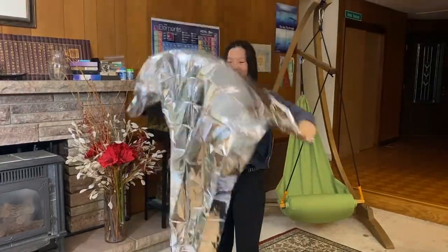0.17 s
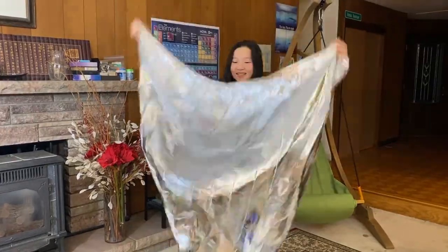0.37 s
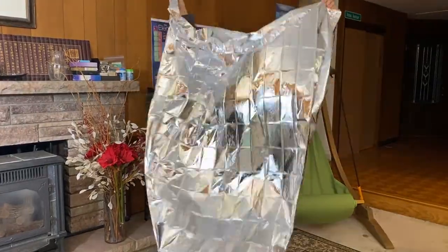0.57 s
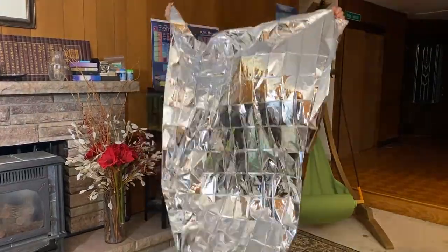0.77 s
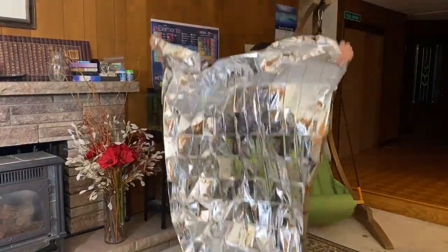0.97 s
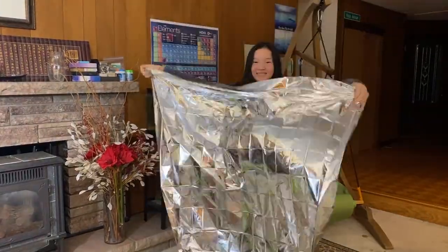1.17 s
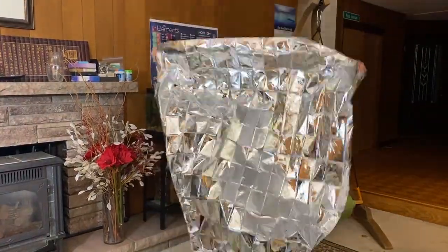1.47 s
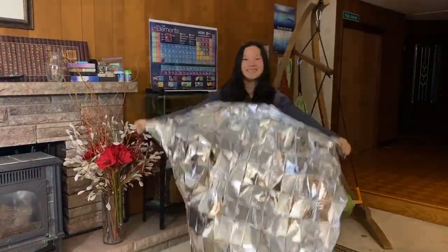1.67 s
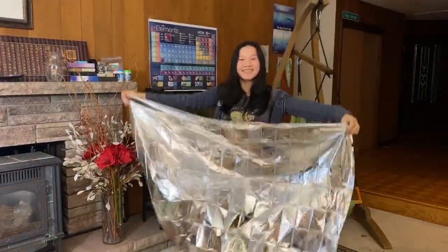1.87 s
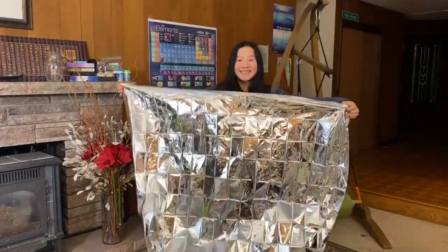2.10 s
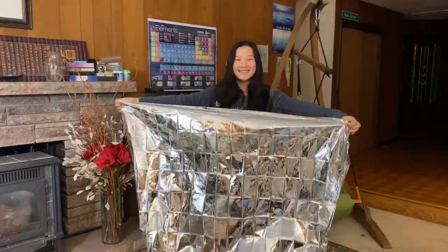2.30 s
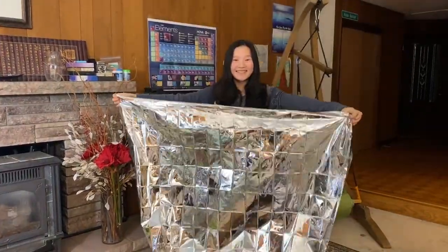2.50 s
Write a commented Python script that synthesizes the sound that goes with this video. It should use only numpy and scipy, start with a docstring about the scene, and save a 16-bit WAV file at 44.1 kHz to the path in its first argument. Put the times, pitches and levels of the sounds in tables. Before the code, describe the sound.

Bright, dense crackling of a foil-like sheet being flung and spread: a strong early surge, a lull, several shorter swells, then quiet rustling, heard in stereo from a few metres away in a living room.

```python
"""A thin metallised plastic sheet is shaken and spread out a few metres away in a panelled living room.
Thousands of creases buckle each second, more and harder the faster the sheet moves: random clicks,
which the room's dying noise tails smear into a rustle. A flap of the whole sheet is a low puff of noise.
A close pair of microphones hears it over a faint low room tone of steady, dull noise."""
import sys
import numpy as np
from scipy import signal
from scipy.fft import rfft, irfft, next_fast_len
from scipy.io import wavfile

SR = 44100
rng = np.random.default_rng(int(sys.argv[2]) if len(sys.argv) > 2 else 0)


def unload_wav(signal):
    """Save mono or channel-first audio to the path in sys.argv[1] as 16-bit WAV at rate SR, clipped to [-1, 1]."""
    wavfile.write(
        sys.argv[1],
        SR,
        np.round(np.clip(np.atleast_2d(signal).T, -1, 1) * 32767).astype(np.int16),
    )


def invert_db(level):
    """Linear amplitude ratio for a level in decibels (20 dB per decade), elementwise."""
    return 10 ** (np.asarray(level, dtype=float) / 20)


N = 116865   # length in samples


# Movement of the sheet a few metres off, as the rustle at the microphone pair, before the sheet's gain.
# Each row: time in seconds [s], level in dB [dB], treble over that level [dB], lows over that level [dB].
SHEET_MOTION = [(0.0, -43.5, 0, -1.5), (0.1, -44, -3.5, -3.5), (0.15, -40, -1, -5), (0.239, -34, .3, 1),
                (0.3, -36, -1.2, 2), (0.39, -35.5, -2.5, -4.5), (0.425, -29.5, 2.5, -5.5),
                (0.459, -26.5, 2, 3.5), (0.521, -31, -0.7, -1.5), (0.661, -37.5, 1.4, -1),
                (0.74, -42, -0.8, -2.5), (0.825, -47, -3, -3), (0.855, -45, -2, -3), (0.97, -51, -1.5, -2),
                (1.065, -47, -.4, -5), (1.11, -50.5, 0, 5), (1.19, -46.5, -3, -6), (1.24, -41, 1, -2.5),
                (1.35, -35, -0.5, -4), (1.42, -40, -0.5, -1.5), (1.5, -41, -.6, -3),
                (1.61, -45, -1.5, -2.5), (1.68, -40.5, -2.5, -5), (1.71, -36.5, 3.5, -2),
                (1.755, -32.5, -0.2, 4.3), (1.83, -45, -3, -1), (1.875, -43.5, -1.5, -3.5),
                (1.941, -36, -0.7, -4.5), (1.99, -34, -2.2, -5), (2.1, -40.5, -0.5, -1),
                (2.2, -43, -5, -8.5), (2.34, -49.5, -4, -1.5), (2.45, -49, -5, -2.5), (2.52, -52, -6.5, -4),
                (2.565, -49.5, -2.5, -4), (2.65, -51.5, -5.5, -2.2)]
# Spectrum of the part that both microphones hear alike, with a narrow gap near 13.4 kHz.
# Each row: frequency in hertz [Hz], gain per hertz in dB [dB].
COMMON_SPECTRUM = [(18, -42), (30, -39), (60, -7), (112, -5.5), (230, -2.5), (500, -2.5), (1240, -1.5),
                   (5300, -2.5), (7470, -2), (8530, -5.5), (10800, 1.44), (12500, -3.5), (12900, 6),
                   (13200, -21), (13650, -21), (13900, 3), (14600, 1), (15700, -11), (16500, -16)]
# Spectrum of the part in which the left and right microphones differ.
# Each row: frequency in hertz [Hz], gain per hertz in dB [dB].
DIFFERENCE_SPECTRUM = [(18, -50), (60, -33), (190, -32), (300, -15.5), (500, -7.5), (1150, -5), (1900, -3),
                       (2340, -6), (3570, -3.5), (6720, -4), (8500, 3), (9400, 0), (10200, -7.5),
                       (10800, -12), (11900, -6), (12600, -6), (13200, -9), (14000, -12), (15000, -7),
                       (16500, -11)]


def sheet():
    """Buckling creases, direct and through the room, in half-octave bands that follow the movement."""
    treble_hz, lows_hz = 8250, 424   # where the treble and the lows begin
    flicker_db, flicker_hz = 0.73, 11   # each band wavers on its own
    room_db = -2.5   # room sound against direct sound
    seconds, *columns = np.transpose(SHEET_MOTION)
    level_db, treble_db, lows_db = [np.interp(np.arange(N) / SR, seconds, c) for c in columns]

    common, difference = snaps(level_db), snaps(level_db)
    wet = invert_db(room_db) * room(common)
    loudness = np.sqrt(1 + invert_db(2 * room_db))
    common = (common + wet[0]) / loudness
    difference = (difference + wet[1]) / loudness
    pair = np.array([colour(common, lambda hz: at_hz(COMMON_SPECTRUM, hz)),
                     colour(difference, lambda hz: at_hz(DIFFERENCE_SPECTRUM, hz))])

    size = next_fast_len(N)
    spectrum = rfft(pair, size)
    octave = np.log2(np.arange(size // 2 + 1) * SR / size + 1)
    rustle = 0
    for centre in np.arange(3, 15.1, .5):   # log2 of the band's frequency in Hz
        triangle = np.clip(1 - 2 * np.abs(octave - centre), 0, 1)
        band = irfft(spectrum * triangle, size)[:, :N]
        treble_share = 1 / (1 + (treble_hz / 2 ** centre) ** 4)
        lows_share = 1 / (1 + (2 ** centre / lows_hz) ** 2)
        flicker = flicker_db * drift(flicker_hz)
        rustle = rustle + band * invert_db(treble_share * treble_db + lows_share * lows_db + flicker)
    return invert_db(7.5) * rustle


def snaps(level_db):
    """Creases buckle as clicks of uneven size, more often with movement and in clumped runs."""
    snaps_per_s, rate_follows = 7000, .3   # rate at the mean level; dB of rate per dB of level
    size_spread_db = 3.   # scale of the random excess in size
    clump_db, clump_hz = 1.5, 60.   # creases give way in runs
    motion_db = rate_follows * (level_db - level_db.mean())
    rate_db = motion_db + clump_db * drift(clump_hz)
    born = rng.random(N) < snaps_per_s * invert_db(rate_db) / SR
    sizes = invert_db(size_spread_db * np.minimum(rng.exponential(1, N), 4)) * rng.choice([-1, 1], N)
    even = born * sizes / invert_db(motion_db / 2)   # takes out the power that the faster rate adds
    return rms_one(even) * invert_db(level_db)


def room(x, count=5):
    """Each part of the sheet excites two dying noise tails, one common and one for the difference."""
    t60_s, first_echo_s = 0.31, 0.0055
    t = np.arange(SR // 2) / SR
    part = rng.integers(0, count, N)   # the part of the sheet that sounds at each sample
    lead = len(t) // 2   # the rustle was already sounding
    out = 0
    for k in range(count):
        onset = np.clip(t / first_echo_s - 1, 0, 1)   # silent, then a ramp as long as the silence
        tails = rng.standard_normal((2, len(t))) * invert_db(-60 * t / t60_s) * onset
        tails = tails / np.sqrt((tails ** 2).sum(axis=1, keepdims=True))
        mine = np.pad(x * (part == k), (lead, 0), "reflect")
        out = out + signal.fftconvolve(mine[None], tails, axes=1)[:, lead:lead + N]
    return out


# The whole sheet flaps and pushes air towards the microphones.
# Each row: time of the peak in seconds [s], level at the peak in dB [dB], pitch region in hertz [Hz].
SHEET_FLAPS = [(.445, -46, 100)]


def flaps():
    """Pushed air is a soft low puff: a narrow band of noise that swells and dies exponentially."""
    rise_s, fall_s = 0.022, 0.056
    t, out = np.arange(N) / SR, 0
    for peak_s, db, hz in SHEET_FLAPS:
        band = signal.butter(2, [hz / 1.15, hz * 1.05], "band", fs=SR, output="sos")
        puff = signal.sosfilt(band, rng.standard_normal(N))
        shape = np.exp(np.minimum((t - peak_s) / rise_s, (peak_s - t) / fall_s))
        out = out + invert_db(db) * rms_one(puff) * shape
    return out * np.array([[1], [.1]])   # common part, difference part


# Colour of the living room's own faint tone at the microphones.
# Each row: frequency in hertz [Hz], relative gain per hertz in dB [dB].
TONE_COLOUR = [(25, -10), (55, 6), (120, -2), (300, -7), (2000, -25), (16000, -24)]


def room_tone():
    """The quiet room is steady dull noise, nearly the same on both sides."""
    tone_db, difference_db = -61.5, -13   # common part; difference part against it
    mid, side = rng.standard_normal((2, N))
    mid = colour(mid, lambda hz: at_hz(TONE_COLOUR, hz))
    side = colour(side, lambda hz: at_hz(TONE_COLOUR, hz) + difference_db)
    return invert_db(tone_db) * np.array([mid, side]) / np.sqrt(np.mean(mid ** 2))


def rms_one(x):
    """Scale to rms 1."""
    return x / np.sqrt(np.mean(x ** 2) + 1e-20)


def at_hz(points, hz):
    """Read a table on a log-frequency axis."""
    table_hz, values = np.transpose(points)
    return np.interp(np.log(hz + 1), np.log(table_hz), values)


def colour(x, gain_db):
    """Filter by a function that gives dB for each frequency in Hz."""
    size = next_fast_len(N + 4096)
    hz = np.arange(size // 2 + 1) * SR / size
    return irfft(rfft(x, size) * invert_db(gain_db(hz)), size)[..., :N]


def drift(rate_hz):
    """Slow random wander of rms 1: noise through two equal low-pass poles at rate_hz."""
    r = np.exp(-80 * np.pi * rate_hz / SR)   # computed at every 40th sample
    slow = signal.lfilter([1], [1, -2 * r, r * r], rng.standard_normal(N // 40 + 2002))[2000:]
    return np.interp(np.arange(N) / 40, np.arange(len(slow)), rms_one(slow))


# Lean of the sound towards the left microphone; the right one gets the opposite.
# Each row: frequency in hertz [Hz], gain on the left in dB [dB].
LEFT_LEAN = [(200, -0.4), (500, 0.2), (1400, .6), (5000, 0.64), (9000, -0.45), (14000, 0.3)]


def scene():
    """Common and difference parts add and subtract to make left and right."""
    mid, side = sheet() + flaps() + room_tone()
    left = colour(mid + side, lambda hz: at_hz(LEFT_LEAN, hz))
    right = colour(mid - side, lambda hz: -at_hz(LEFT_LEAN, hz))
    return np.array([left, right])


def top_cut(x):
    """Nothing passes above the cut-off."""
    return signal.sosfilt(signal.butter(12, 16900, fs=SR, output="sos"), x)


def record(dry):
    """A steep low-pass filter cuts the top of the finished mix."""
    cutoff_hz = 15740
    low_pass = signal.ellip(14, .3, 80, cutoff_hz, fs=SR, output="sos")
    mix = signal.sosfilt(low_pass, dry)
    return top_cut(mix)


dry = scene()
out = record(dry)
unload_wav(out)
```